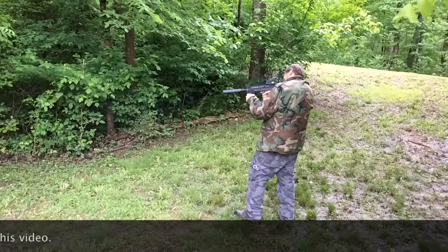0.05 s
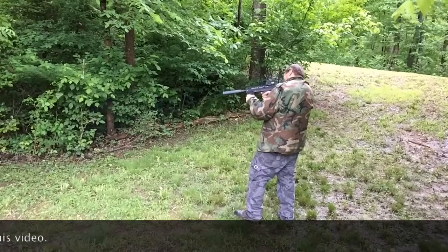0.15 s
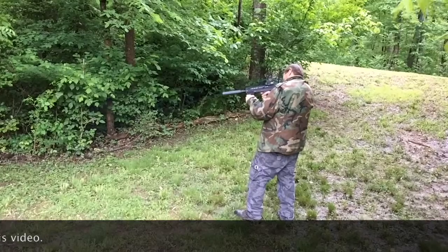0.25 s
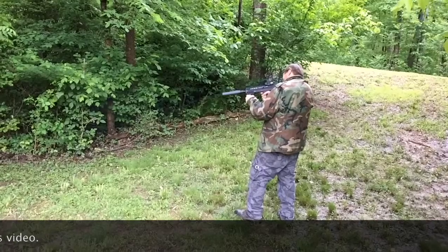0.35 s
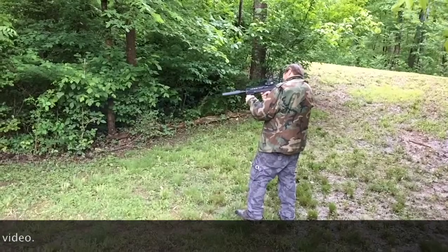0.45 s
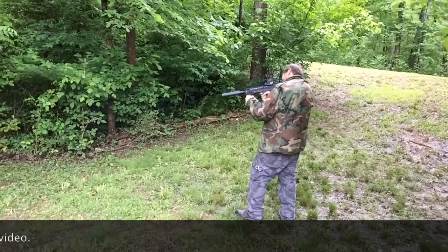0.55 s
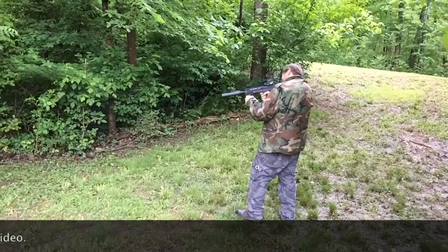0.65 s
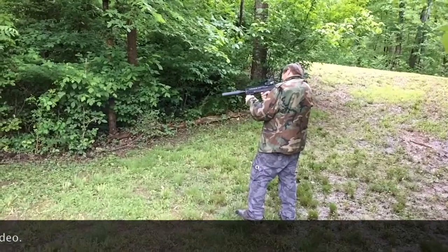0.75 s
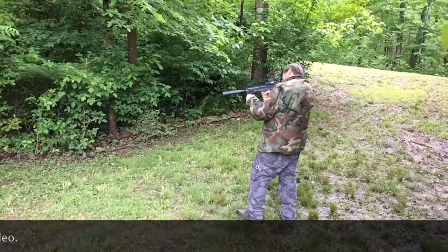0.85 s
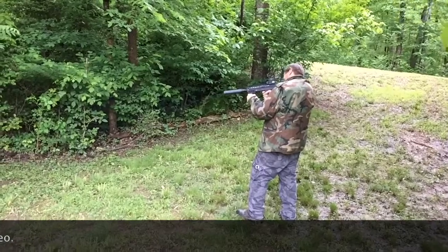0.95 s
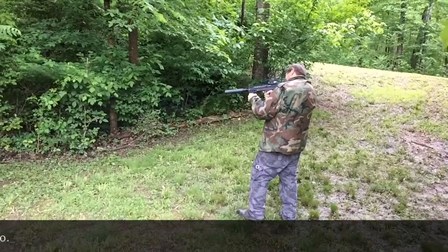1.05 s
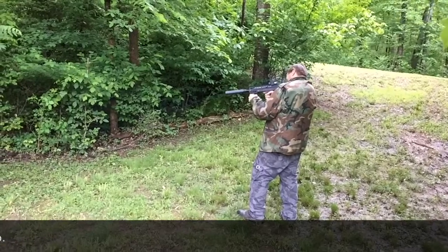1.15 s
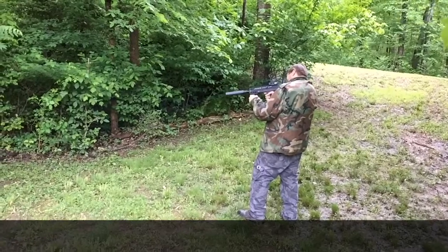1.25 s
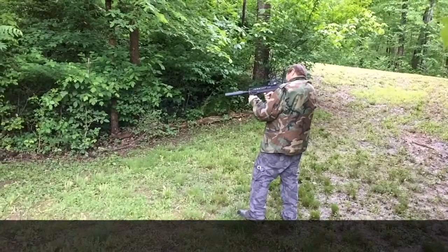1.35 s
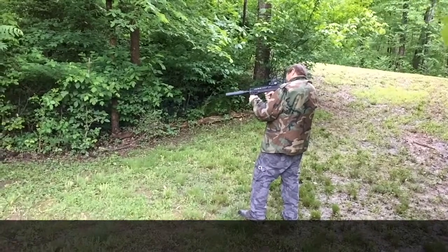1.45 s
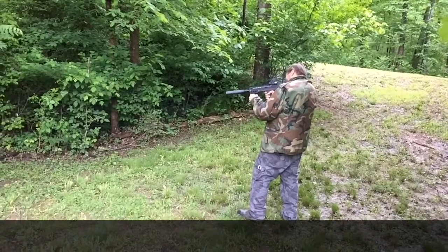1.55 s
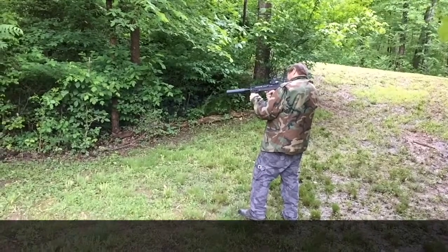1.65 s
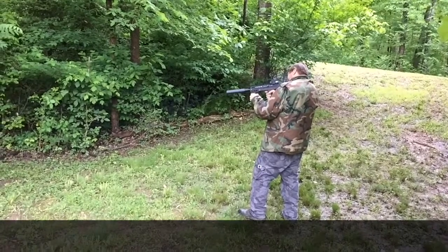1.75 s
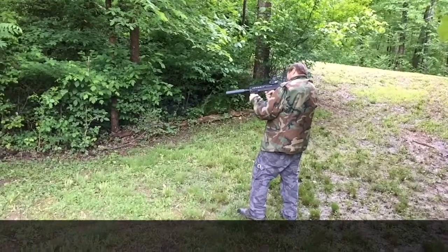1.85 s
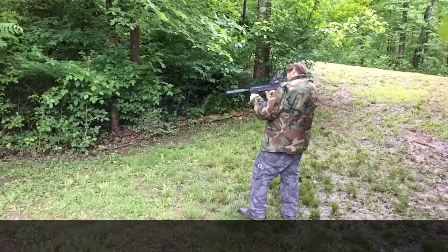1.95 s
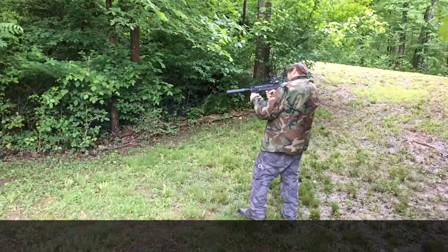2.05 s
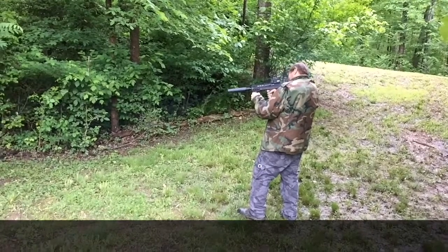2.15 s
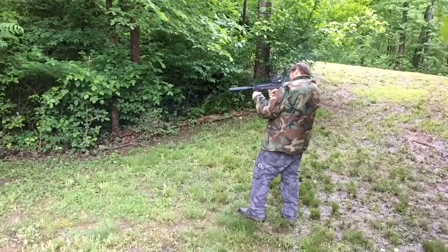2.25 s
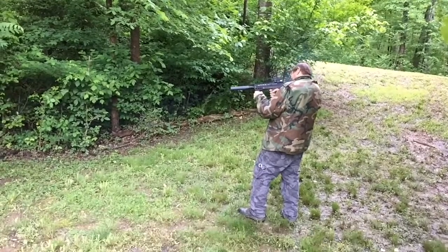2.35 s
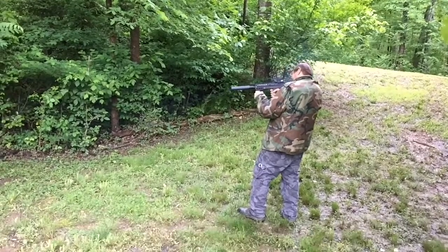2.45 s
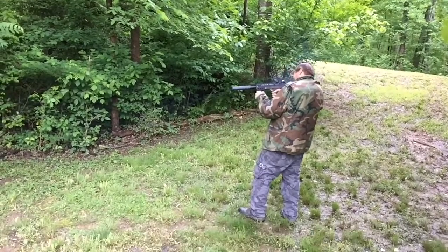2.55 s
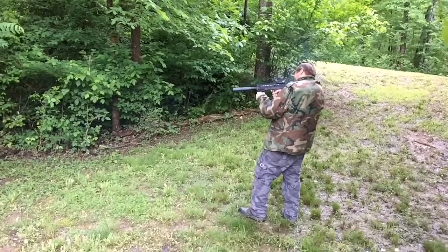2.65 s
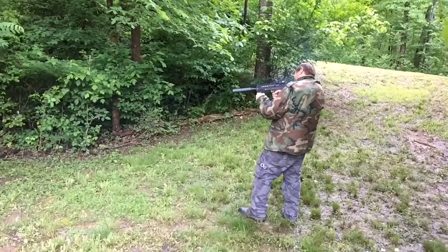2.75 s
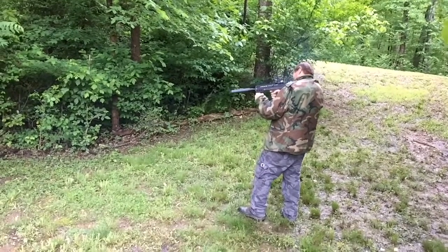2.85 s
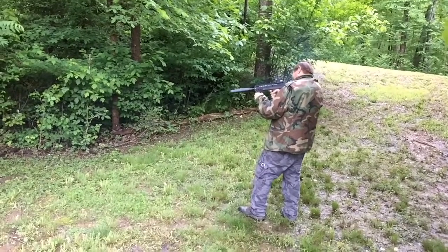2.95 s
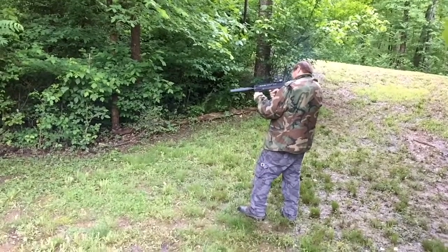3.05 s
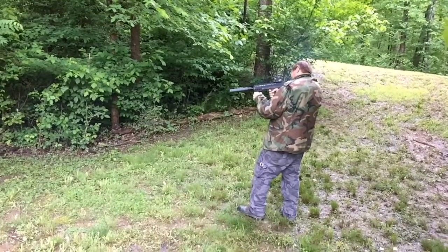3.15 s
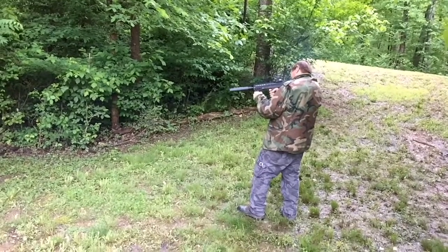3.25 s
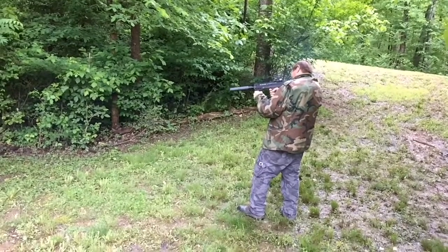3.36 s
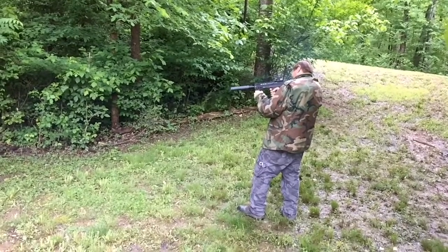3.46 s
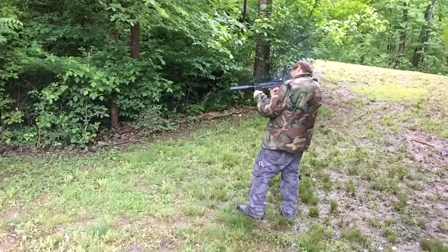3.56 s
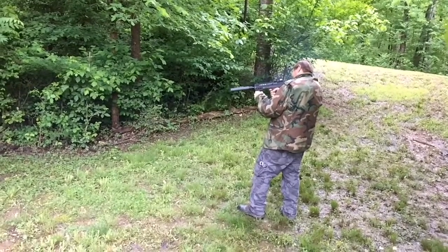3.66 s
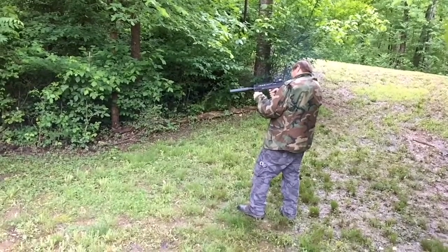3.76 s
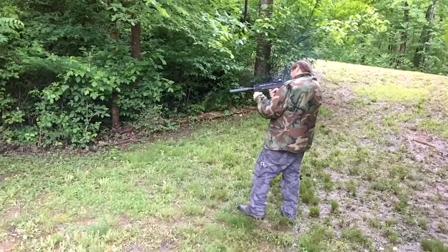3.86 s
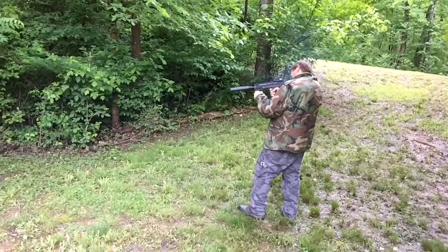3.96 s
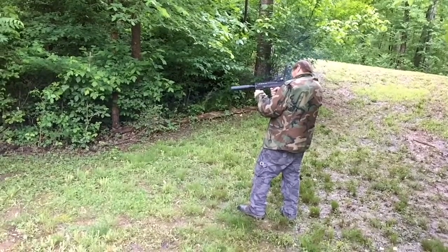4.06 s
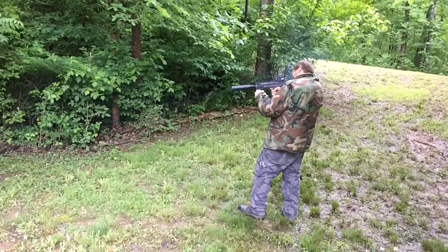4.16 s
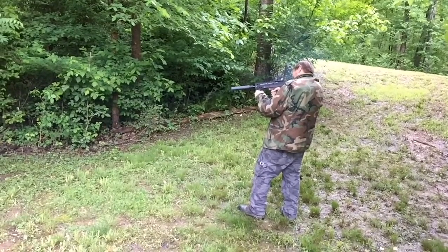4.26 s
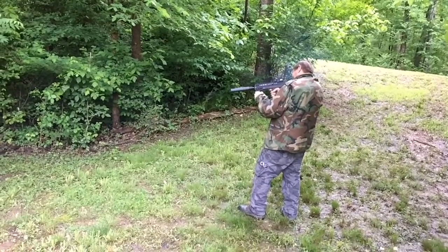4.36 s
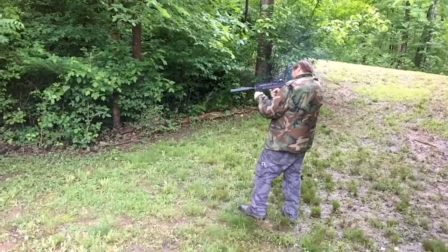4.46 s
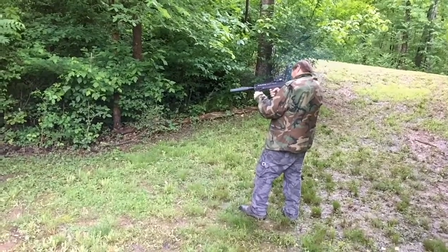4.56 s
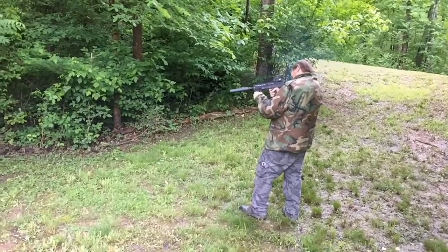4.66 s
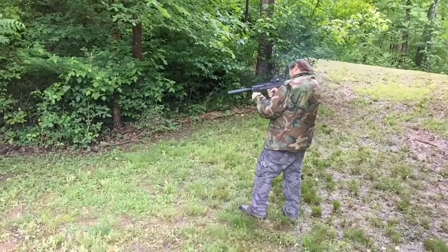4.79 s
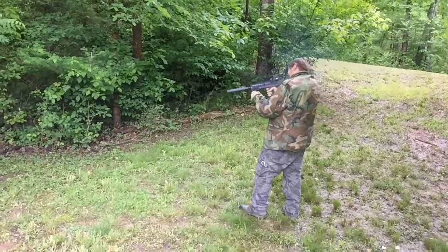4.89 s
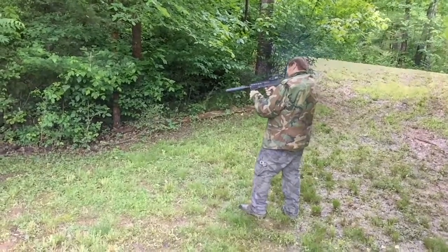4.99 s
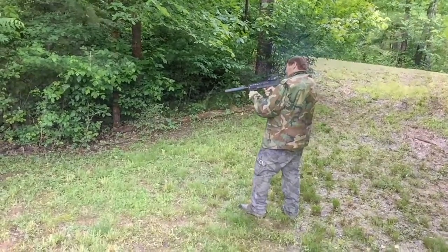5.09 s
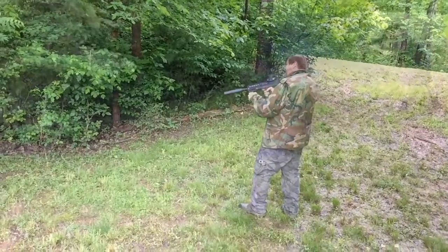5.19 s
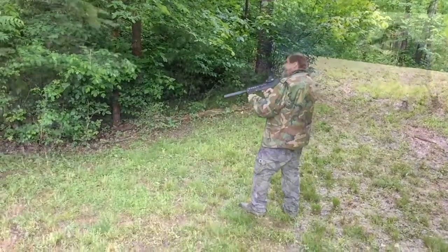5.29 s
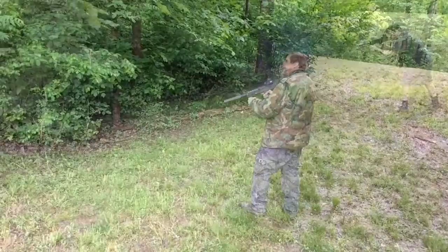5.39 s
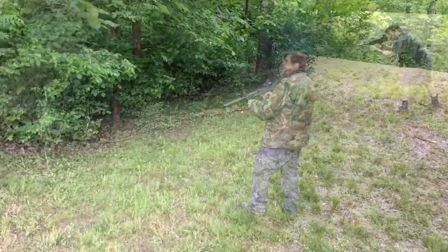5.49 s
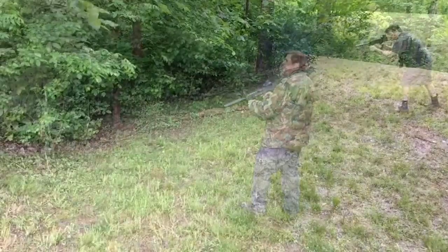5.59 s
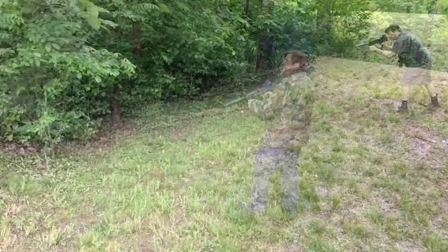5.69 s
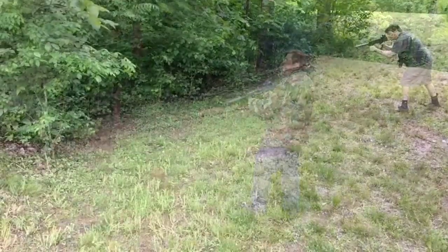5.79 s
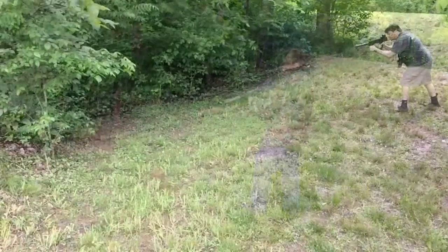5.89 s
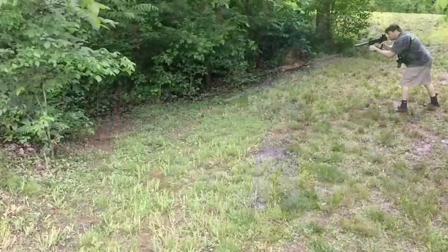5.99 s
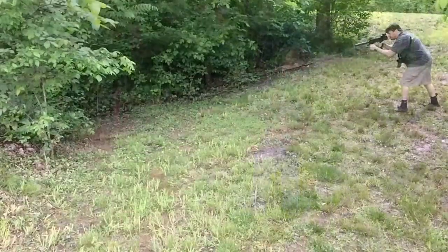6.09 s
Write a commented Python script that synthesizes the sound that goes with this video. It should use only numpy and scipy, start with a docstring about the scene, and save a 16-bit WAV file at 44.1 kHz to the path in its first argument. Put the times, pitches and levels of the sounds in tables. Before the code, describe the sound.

Outdoors beside a wood, a suppressed submachine gun fires five bursts of three to eight rounds after the tail of an earlier one. Each round is a soft gas hiss, steel bolt clack and low thud of a bullet in soil, with a bright leafy echo. The bolt then snaps shut on an empty chamber, echoes fade, air swells, and a faster gun begins firing. The microphone is close and slightly overloaded.

```python
"""A suppressed open-bolt submachine gun fires bursts into an earth bank at the edge of a wood.
Each round is a noise hiss of gas, a clack and ring of the bolt and a low heave of the soil.
Leaves, wood and a far tree line return each band's power as scrambled noise, over rumble and open air.
The bolt slams on an empty chamber; then the air swells, most of the echo fades,
and a second, faster gun fires from nearer to the bank."""
import sys
import numpy as np
from scipy import signal
from scipy.fft import rfft, irfft, next_fast_len
from scipy.io import wavfile

SR = 44100
rng = np.random.default_rng(int(sys.argv[2]) if len(sys.argv) > 2 else 0)


def wrap_up_sound(samples):
    """Save the sound to the file named by the first command line argument, as 16-bit audio."""
    columns = np.atleast_2d(samples).T
    # keep every value between -1 and 1, then stretch to whole-number steps
    tamed = np.clip(columns, -1, 1)
    steps = np.round(tamed * 32767).astype(np.int16)
    wavfile.write(sys.argv[1], SR, steps)


N = 270333
LEAD = SR  # samples ahead of 0 s, for the burst that begins early
BLOCK = 32  # samples per step of echo power
BAND_OCTAVES = .4
BAND_HZ = 16000 * 2 ** (BAND_OCTAVES * np.arange(-21, 1))

# Bursts of the first gun; of the one before 0 s only the end is heard.
# Each row: first shot in seconds, cycle in seconds, bullet flight in seconds, shot in dB,
# sear click in dB, magazine knock in dB, list of each bullet's thump in dB.
BURSTS = [(-0.42, .085, 0.046, 1.5, -28, -26, [-8, -8.5, -8, -8.5]),
          (0.7945, .0837, .0385, -1.66, -24.5, -24, [0, -6.5, -6.5, -17]),
          (1.513, 0.083, .0385, .5, -27, -24, [-7.5, -2.5, -8.5]),
          (1.974, .0837, .039, 0, -33.5, -31.5, [-11, -16, -15, -4, -4.5, -6.5, -6.5, -5.5]),
          (3.272, .083, .040, 0.1, -23, -27.5, [-8, -3.5, -4.5, -8]),
          (3.928, 0.083, 0.04, .5, -31, -26, [-2.5, -12.5, -5, -6])]
# The burst of the faster gun, nearer to the bank. Each row: the same columns and units.
FAST_BURSTS = [(5.8836, .0655, .013, 0, -32.5, -30, [-15.5, -16, -27, -18.5])]
# The bolt closes on the empty chamber. One row: time in seconds, level in dB.
DRY_SLAM = (4.6748, -9)
# Modes of the steel receiver and bolt. Each row: frequency in Hz, level in dB, t60 in seconds.
STEEL = [(1200, -6.5, .06), (1790, -9.5, .03), (2830, -11.5, 0.03), (4060, -5, .03), (4460, -5, 0.047),
         (4960, -6, .04), (5800, -5, .03), (6750, -7.5, .03), (7230, 0, 0.037), (8515, -4, .025),
         (9900, -6.5, .02)]


def undb(db):
    """Decibels to gain."""
    return 10 ** (np.asarray(db) / 20)


def clock(length):
    """Sample times of a sound of this length in seconds."""
    return np.arange(int(length * SR)) / SR


def level_curve(points):
    """Gain over the whole scene from (s, dB) points."""
    return undb(np.interp(np.arange(N) / SR, *np.transpose(points)))


def gain_at(colour, hz):
    """Gain of a spectrum of (Hz, dB) points at these frequencies."""
    points, db = np.transpose(colour)
    return undb(np.interp(np.log(hz), np.log(points), db))


def noise(colour, size):
    """Noise of rms 1 with this spectrum, rolled off below its lowest point."""
    count = next_fast_len(size)
    f = np.maximum(np.fft.rfftfreq(count, 1 / SR), 1)
    gain = gain_at(colour, f) * f / np.hypot(f, colour[0][0] / 2)
    y = irfft(rfft(rng.standard_normal(count)) * gain, count)[:size]
    return y / y.std()


def fade(t, t60, rise=0., hold=0.):
    """Envelope that rises, holds until t = hold and dies away; silent before t = 0."""
    attack = np.clip(t / max(rise, 1 / SR), 0, 1)
    return attack * undb(-60 * np.maximum(t - hold, 0) / t60)


def burst(colour, t, t60, rise=0., hold=0.):
    """A dying puff of coloured noise."""
    return noise(colour, len(t)) * fade(t, t60, rise, hold)


def ring(modes, t):
    """One blow on a set of modes, which shift and change weight from blow to blow."""
    chance = rng.standard_normal((len(modes), 3))
    y = 0
    for (hz, db, t60), (weight, detune, phase) in zip(modes, chance):
        shift = 1 + .015 * detune
        wave = np.sin(2 * np.pi * hz * shift * t + np.pi * phase)
        y = y + undb(db + 2 * weight) * wave * fade(t, t60)
    return y / np.sqrt(np.sum(undb(np.array(modes)[:, 1]) ** 2) / 2)


def heave(t, hz, peak_s):
    """A low pressure wave that swells until peak_s and dies within a few cycles."""
    u = t / peak_s
    return -u ** 1.5 * np.exp(1.5 * (1 - u)) * np.sin(2 * np.pi * hz * t)


def rattle(t):
    """Uneven level of chattering parts, drawn anew every two milliseconds."""
    knots = np.arange(0, .2, .002)
    return undb(2.5 * np.interp(t, knots, rng.standard_normal(len(knots))))


def add(track, s, sound):
    """Mix a sound in at time s; the track begins LEAD samples early."""
    i = LEAD + int(s * SR)
    part = sound[:max(len(track) - i, 0)]
    track[i:i + len(part)] += part


def rounds(bursts):
    """Every round of these bursts: (s, place in its burst, shot dB, bullet flight s, thump dB)."""
    first_cycle_short_s = .003  # the bolt starts from the sear, so the second shot comes early
    climb_s = .0012  # per round: the muzzle climbs and each bullet lands further up the bank
    shots = []
    for start, cycle, flight, db, _, _, thumps in bursts:
        for k, thump in enumerate(thumps):
            s = start + k * cycle - first_cycle_short_s * (k > 0)
            shots.append((s, k, db, flight + k * climb_s, thump))
    return shots


def gun(bursts, hiss_colour, recoil_s, hiss_db, body_db, tube_db, clack_db, ring_db, puff_db, puff_hz):
    """Gas leaves the suppressor for some milliseconds; the bolt flies back and hits its stop."""
    # Low body of the shot. Each row: frequency in Hz, density in dB per Hz.
    body_colour = [(30, -3.5), (110, 4), (300, 0.5), (600, 1), (1200, -1), (2000, -6.5), (5000, -51.5),
                   (13000, -59.5)]
    # Gas column in the suppressor tube. Each row: frequency in Hz, level in dB, t60 in seconds.
    tube_modes = [(225, -2, 0.033), (333, -2, .05), (560, -1, .05), (1205, -3, 0.065), (1460, -5, .04),
                  (1818, -5, .04), (2140, -5, .04)]
    # Clatter of the bolt. Each row: frequency in Hz, density in dB per Hz.
    clatter_colour = [(150, -18.5), (800, -12), (1300, -15), (3300, -10.5), (4700, 0.5), (7000, -6.5),
                      (12000, -12), (12600, -33.5), (15000, -59.5)]
    shot_scatter_db, puff_scatter_db = 1, 3.5  # no two cartridges are alike
    # air in the cold suppressor: the first round pops more and puffs less
    first_pop_db, first_puff_db = 2, -4
    second_hiss_db = -2  # the second shot of a burst hisses more softly

    out, t = np.zeros(LEAD + N), clock(0.11)
    for s, k, db, _, _ in rounds(bursts):
        hiss, body, clatter = db + shot_scatter_db * rng.standard_normal(3)
        hiss = hiss + second_hiss_db * (k == 1)
        body = body + first_pop_db * (k == 0)
        puff = puff_db + first_puff_db * (k == 0) + puff_scatter_db * rng.standard_normal()
        gas = undb(hiss + hiss_db) * burst(hiss_colour, t, t60=0.078, rise=0.0013, hold=0.0062)
        pop = undb(body + body_db) * burst(body_colour, t, t60=.03, rise=0.0013, hold=0.0043)
        tube = undb(body + tube_db) * ring(tube_modes, t - .001)
        push = undb(puff) * heave(t, puff_hz, peak_s=.004)
        # time since the bolt hit its stop, a little uneven
        back = t - recoil_s - 0.0011 * rng.standard_normal()
        clack = burst(clatter_colour, back, t60=0.11, rise=.001) * rattle(t)
        steel = ring(STEEL, t) + ring(STEEL, back)
        metal = undb(clatter + clack_db) * clack + undb(clatter + ring_db) * steel
        add(out, s, gas + pop + tube + push + metal)
    return out


def bank(bursts, thump_db, thump_hz, slap_db, shudder_db, shudder_hz):
    """A bullet slaps into the soil, which heaves and, two cycles on, shudders."""
    # Slap of the bullet. Each row: frequency in Hz, density in dB per Hz.
    slap_colour = [(40, -5), (250, 0.5), (550, -1.5), (1000, -2.5), (1600, -9), (3000, -7), (8000, -23),
                   (13000, -50)]
    # harder ground thumps less, but higher, and slaps more: per dB of thump lost
    hard_hz_per_db, hard_slap_per_db = 1.54, .5
    hardest_slap_db = 6  # the most that hard ground adds to the slap
    soil_scatter_octaves = .14  # no two spots of the bank are alike

    out, t = np.zeros(LEAD + N), clock(.15)
    for s, _, _, flight, db in rounds(bursts):
        hz = (thump_hz - hard_hz_per_db * db) * 2 ** (soil_scatter_octaves * rng.standard_normal())
        pitch = shudder_hz * rng.uniform(.85, 1.15)
        late = t - 2 / hz
        shudder = -np.sin(2 * np.pi * pitch * late) * fade(late, t60=0.049, rise=0.0065, hold=0.0062)
        soil = heave(t, hz, peak_s=0.0047) + undb(shudder_db) * shudder
        add(out, s + flight, undb(db + thump_db) * soil)
        slap_level = slap_db + min(-hard_slap_per_db * db, hardest_slap_db)
        slap = burst(slap_colour, t, t60=0.057, rise=0.00067, hold=0.0024)
        add(out, s + flight - .001, undb(slap_level) * slap)
    return out


def space(colour, db, delay_s, rise_s, t60):
    """One group of reflectors: the power that it returns in each band, block by block."""
    power = fade(clock(1.8)[::BLOCK] - delay_s, t60, rise_s, rise_s) ** 2
    bass_loss = 1 / (1 + (55 / BAND_HZ) ** 3)  # the longest waves pass between the trees
    returned = (undb(db) * gain_at(colour, BAND_HZ) * bass_loss) ** 2
    return np.outer(returned, power / power.sum())


def echo(x, response):
    """Countless moving leaves scramble the phase: each band's power comes back as a smooth wash."""
    count = BLOCK * next_fast_len(len(x) // BLOCK + 1, real=True)
    octave = np.log2(np.fft.rfftfreq(count, 1 / SR) + 1)
    sound = rfft(np.float32(x), count)
    scatter = rfft(np.float32(rng.standard_normal(count)))
    out = 0
    for hz, returned in zip(BAND_HZ, response):
        offset = np.clip((octave - np.log2(hz)) / BAND_OCTAVES, -1, 1)
        band = np.cos(np.pi / 2 * offset, dtype=np.float32)
        power = np.mean(irfft(sound * band).reshape(-1, BLOCK) ** 2, axis=1)
        wash = np.abs(signal.fftconvolve(power, returned)[:len(power)])
        level = np.sqrt(wash / np.mean(band ** 2))
        out = out + np.repeat(level, BLOCK) * irfft(scatter * band ** 2)
    return out[:len(x)]


def outdoors():
    """Low rumble and open air under everything, each a coloured noise on a slow level curve."""
    # Low outdoor rumble. Each row: frequency in Hz, density in dB per Hz.
    rumble_colour = [(25, -12), (60, -4), (130, -0.5), (200, -8), (320, -19), (700, -21.5), (3000, -30.5),
                     (9000, -55)]
    # Its level, strongest around the first gun. Each row: time in seconds, level in dB.
    rumble_curve = [(0, -43.5), (0.381, -43), (.55, -47.5), (3.05, -45.5), (4.5, -54), (6.13, -65)]
    # Open air. Each row: frequency in Hz, density in dB per Hz.
    air_colour = [(25, -15), (65, -4), (170, 4), (280, -10), (380, -6), (500, -11.5), (800, -18.5),
                  (1800, -26), (5000, -33), (8000, -38.5), (15000, -44)]
    # Its level, swelling toward the second gun. Each row: time in seconds, level in dB.
    air_curve = [(0, -56.5), (4.901, -59), (5.45, -47.5), (5.8, -45.5), (6.13, -35)]
    rumble = noise(rumble_colour, N) * level_curve(rumble_curve)
    air = noise(air_colour, N) * level_curve(air_curve)
    return rumble + air


def bolt(closings, travel_s, run_s, slide_db=-11, knock_ring_db=-3):
    """The sear clicks travel_s before each closing; the bolt slides run_s and knocks the magazine."""
    # Click, slide and knock. Each row: frequency in Hz, density in dB per Hz.
    click_colour = [(150, -23), (600, -6.5), (1000, -7.5), (1600, 1), (4000, 1), (9000, 0), (12000, -5),
                    (15000, -26)]
    out, t = np.zeros(LEAD + N), clock(.15)
    for s, db, knock_db in closings:
        click = burst(click_colour, t, t60=0.0071, rise=0.0013, hold=0.0051)
        slide = undb(slide_db) * burst(click_colour, t, t60=.02, rise=0.022, hold=run_s)
        knock = burst(click_colour, t - run_s, t60=0.041, rise=0.0019, hold=0.0083)
        knock = knock + undb(knock_ring_db) * ring(STEEL, t - run_s)
        add(out, s - travel_s, undb(db) * (click + slide) + undb(knock_db) * knock)
    return out


def after_hiss(start_s, db):
    """A bright hiss swells and dies among the trees, just after the first gun's last burst."""
    # Hiss that hangs in the wood. Each row: frequency in Hz, density in dB per Hz.
    hanging_colour = [(1500, -28), (4000, -10), (5800, 0), (7500, -4), (10000, -17), (13000, -26),
                      (15000, -40)]
    out = np.zeros(LEAD + N)
    add(out, start_s, undb(db) * burst(hanging_colour, clock(.9), t60=.45, rise=0.1, hold=0.34))
    return out


def slam(ring_db, chatter_db):
    """Steel on steel with no cartridge between: a hard snap, a short ring and some chatter."""
    # Snap of the bolt face. Each row: frequency in Hz, density in dB per Hz.
    snap_colour = [(150, -24.5), (550, -22), (1000, -14), (1700, -17.5), (2300, -7.5), (3400, -5.5),
                   (4000, 4), (4800, 1.5), (6000, -5), (8500, -5.5), (11500, -10), (15000, -13.5)]
    out, t = np.zeros(LEAD + N), clock(.15)
    s, db = DRY_SLAM
    snap = burst(snap_colour, t, t60=.011, hold=.0005)
    chatter = undb(chatter_db) * burst(snap_colour, t, t60=0.17) * rattle(t)
    add(out, s, undb(db) * (snap + chatter + undb(ring_db) * ring(STEEL, t)))
    return out


def handling():
    """The bolt runs forward before every burst, and once more onto the empty chamber."""
    first = [(start, click, knock) for start, _, _, _, click, knock, _ in BURSTS]
    fast = [(start, click, knock) for start, _, _, _, click, knock, _ in FAST_BURSTS]
    empty = [(DRY_SLAM[0], -26.5, -36.5)]
    return (bolt(first, travel_s=.0557, run_s=.039) + bolt(fast, travel_s=.0475, run_s=.032)
            + bolt(empty, travel_s=.0448, run_s=.033) + slam(ring_db=-17.5, chatter_db=-16))


def scene():
    """Guns and impacts, their echoes in the trees, and the air."""
    # Gas hiss of the first and of the faster gun. Each row: frequency in Hz, density in dB per Hz.
    first_colour = [(700, -18), (1800, -5.5), (3200, -4.5), (5500, -1.5), (8800, -2), (12000, -8.5),
                    (12600, -34), (15000, -56.5)]
    fast_colour = [(700, -11), (1800, -5.5), (3200, -2.5), (5500, -3.5), (8800, -3), (12000, -6),
                   (15000, -10)]
    # Echo of near leaves, of the wood behind them and of the far tree line.
    # Each row: frequency in Hz, returned level in dB per Hz.
    leaves_colour = [(60, -11.5), (130, -10.5), (350, -12), (750, -14.5), (1400, -5.5), (3300, -1.5),
                     (4850, 3), (6500, -0.5), (11000, -1), (15000, -5)]
    wood_colour = [(50, -13), (130, -14), (350, -7.5), (750, -8.5), (1500, -0.5), (3300, 1.5), (4850, 3),
                   (6500, -3), (10000, -14), (15000, -28)]
    tree_line_colour = [(50, -15), (130, -1.5), (350, -12), (750, -7.5), (1500, 1), (3000, 2.5),
                        (5000, -3.5), (7000, -16.5), (10000, -39.5), (15000, -47)]
    # The far echo fades away. Each row: time in seconds, level in dB.
    fade_points = [(4.55, 0), (4.8, -6), (5.2, -5), (6.13, -22)]

    first = gun(BURSTS, first_colour, recoil_s=.017, hiss_db=-8.5, body_db=-16.5, tube_db=-17.5,
                clack_db=-12.0, ring_db=-18.0, puff_db=-16, puff_hz=104)
    fast = gun(FAST_BURSTS, fast_colour, recoil_s=0.012, hiss_db=-11, body_db=-19, tube_db=-23.0,
               clack_db=-15.0, ring_db=-22.5, puff_db=-22, puff_hz=199.8)
    thumps = bank(BURSTS, thump_db=1, thump_hz=124.5, slap_db=-19.0, shudder_db=-10, shudder_hz=144.5)
    thumps += bank(FAST_BURSTS, thump_db=0, thump_hz=135, slap_db=-24, shudder_db=-9.5, shudder_hz=145)
    steel = handling()

    leaves = space(leaves_colour, db=-2.5, delay_s=0.01, rise_s=0.017, t60=0.33)
    wood = space(wood_colour, db=-14.5, delay_s=.07, rise_s=0.047, t60=1.12)
    tree_line = space(tree_line_colour, db=-22, delay_s=0.29, rise_s=0.24, t60=1.1)
    # only the first gun and the impacts carry to the far trees
    far = echo(first + thumps, leaves + wood + tree_line) + after_hiss(start_s=4.25, db=-40.0)
    # the faster gun stands closer to the bushes; the wood returns half its power here
    near = echo(undb(4.5) * fast + undb(-3.0) * steel, leaves + wood / 2)
    close = (first + fast + thumps + steel + near)[LEAD:]
    return (close + level_curve(fade_points) * far[LEAD:] + outdoors())[None]


def lowpass(x, hz):
    """Steep cut of the top."""
    return signal.sosfilt(signal.ellip(10, .2, 90, hz, fs=SR, output="sos"), x)


def record(dry):
    """The microphone rounds the loudest peaks; the top is cut, lower through the first gun's bursts."""
    dull_hz, top_hz = 12200, 15400
    rounded = 1.225 * np.tanh(dry / 1.113)
    bright = np.interp(np.arange(N) / SR, (4.3, 4.6), (0, 1))  # the top opens between these seconds
    mixed = (1 - bright) * lowpass(rounded, dull_hz) + bright * rounded
    return lowpass(mixed, top_hz)


dry = scene()
out = record(dry)
wrap_up_sound(out)
```